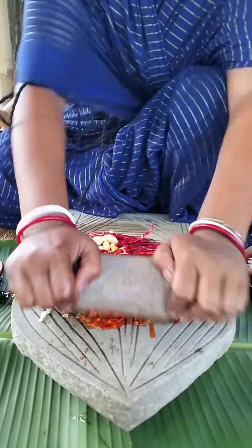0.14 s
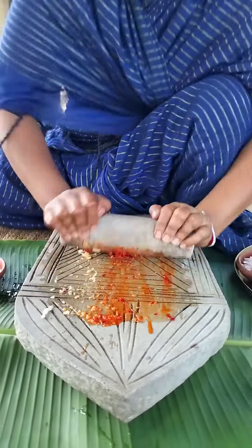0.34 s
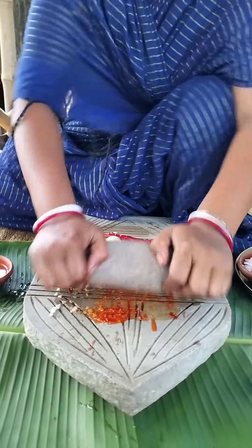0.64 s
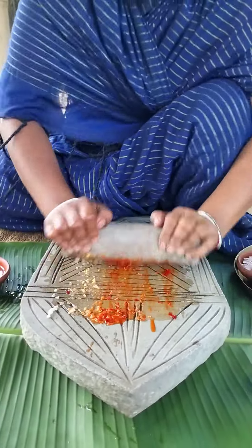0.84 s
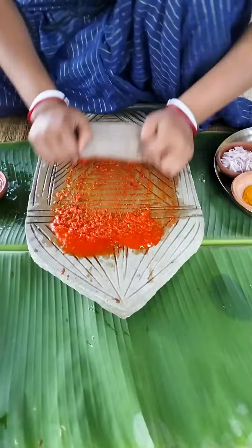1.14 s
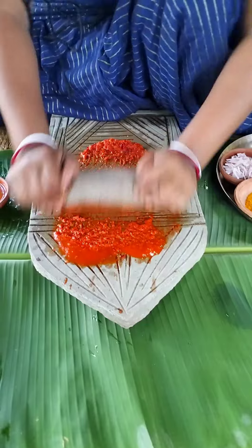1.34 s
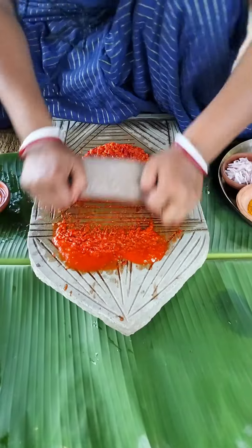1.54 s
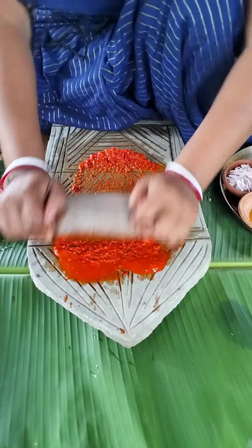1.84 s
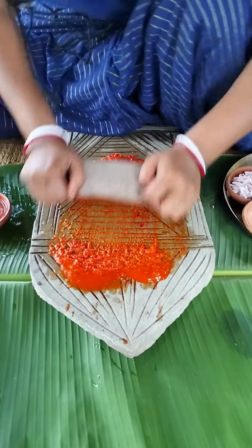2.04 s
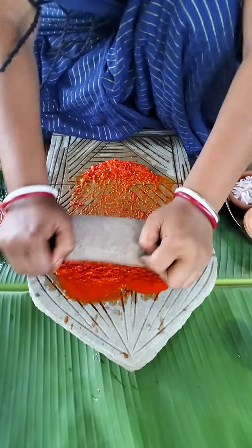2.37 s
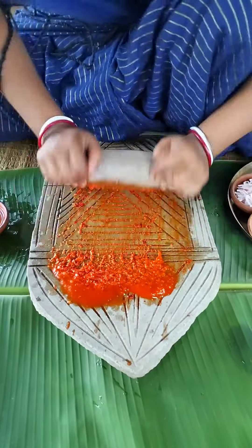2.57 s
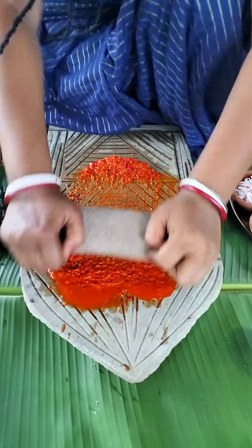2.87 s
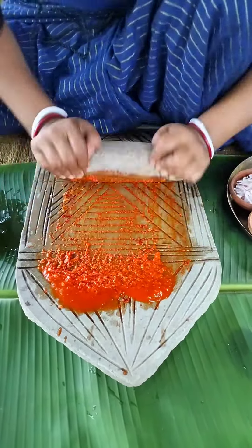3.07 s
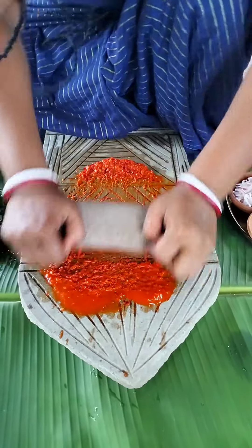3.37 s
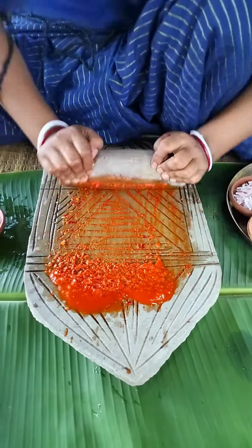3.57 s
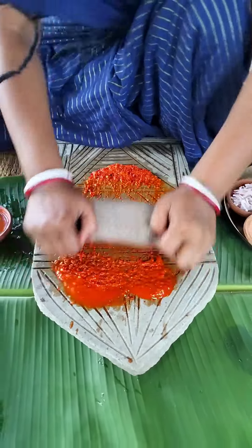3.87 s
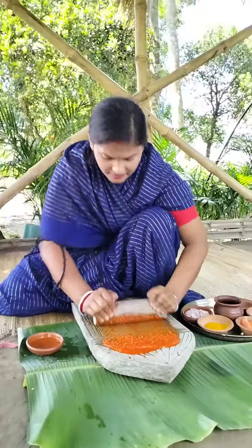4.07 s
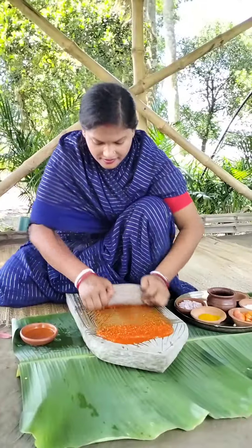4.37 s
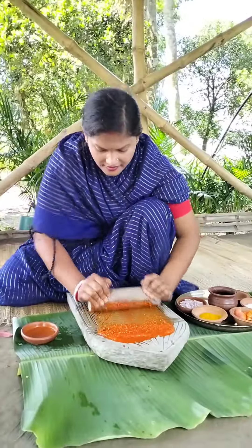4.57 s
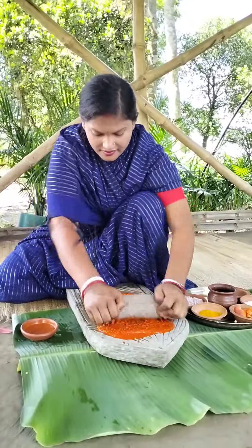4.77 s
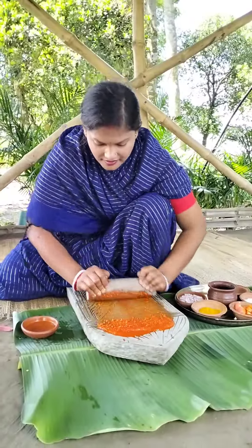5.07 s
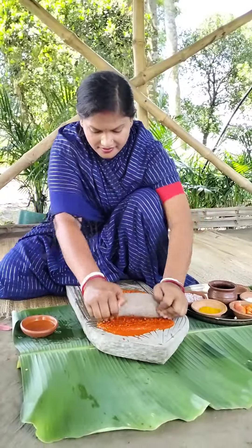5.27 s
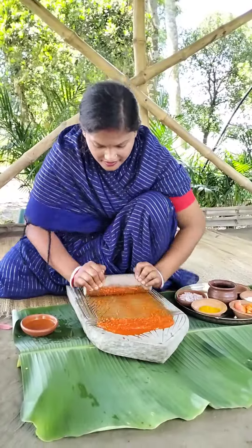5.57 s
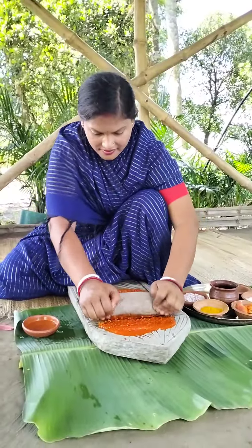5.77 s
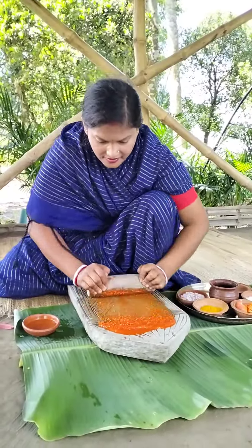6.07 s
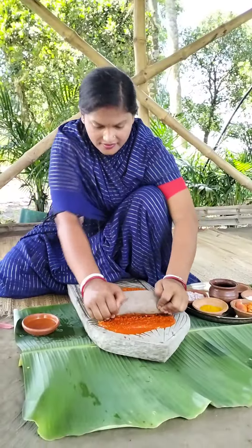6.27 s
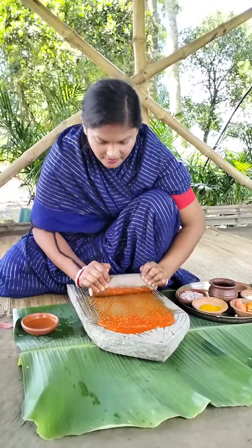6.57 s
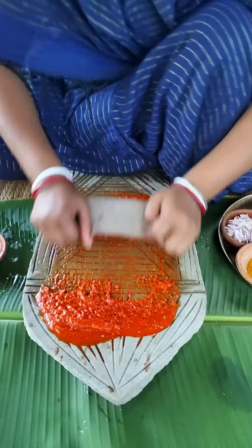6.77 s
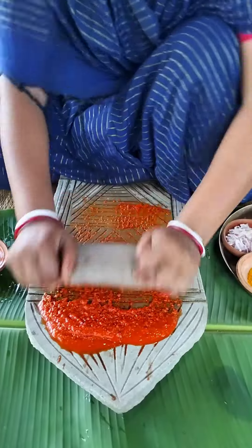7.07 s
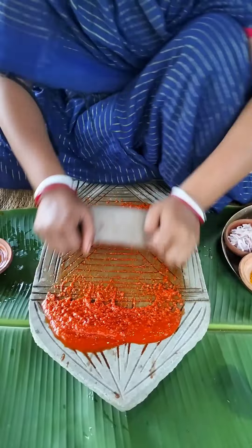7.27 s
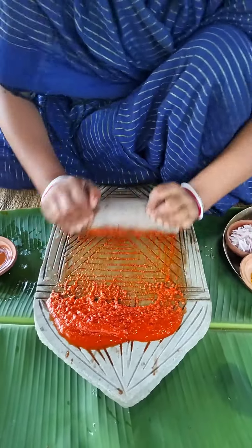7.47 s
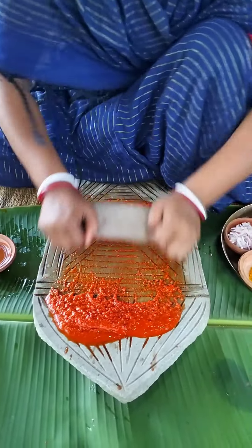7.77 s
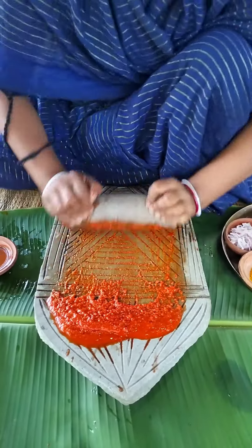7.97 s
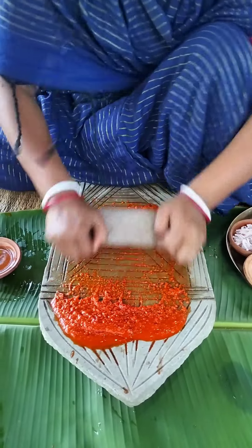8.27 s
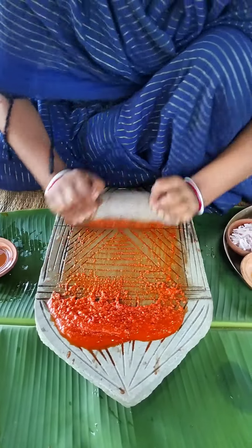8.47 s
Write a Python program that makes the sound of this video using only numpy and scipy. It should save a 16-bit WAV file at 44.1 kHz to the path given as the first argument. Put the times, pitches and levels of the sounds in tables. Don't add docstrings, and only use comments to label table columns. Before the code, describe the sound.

A stone roller is pushed back and forth over a grooved slab, knocking and ringing hollowly, with gritty wet hiss, bangle clicks and buffeting wind.

```python
import sys
import numpy as np
from scipy import signal
from scipy.fft import rfft, irfft, next_fast_len
from scipy.io import wavfile
from scipy.ndimage import uniform_filter1d, map_coordinates

SR = 44100
rng = np.random.default_rng(int(sys.argv[2]) if len(sys.argv) > 2 else 0)


def int16_out(signal):
    q = np.round(np.clip(np.atleast_2d(signal).T, -1, 1) * 32767)
    wavfile.write(sys.argv[1], SR, q.astype(np.int16))


def decibels_to_gain(level_db):
    exponent = np.asarray(level_db, float) / 20
    return 10 ** exponent


N = 380583

# (start [s], left lag [samples], left minus right [dB], low slab note [dB], upper ring notes [dB])
SHOTS = [
    (0, 8, 2.5, 11.5, -5),
    (1.12, -4.5, 0.9, 4, -3),
    (4.02, 9, -1.1, 11.5, 4.5),
    (6.69, -5.5, 0.7, 3, -1.2),
]
START, LAG, PAN, LOW, UPPER = range(5)
# (start [s], end [s])
SILENCE = (6.677, 6.694)
# (grit hiss [dB], wet fizz [dB])
PASTE = [
    (-41, -48.5),
    (-45.5, -53.5),
    (-51.5, -58),
    (-47, -57),
]
WIND_THUD = [(6.2,), (-0.35,), (.5,), (0.323,)]
SECOND_HEARD = [(3.6,), (-0.67,), (0.57,), (-4,)]

# (time [s], level [dB], left minus right [dB])
WIND = [(0, -39, 7.5), (.3, -41, 11.5), (.41, -26, 15.5), (.78, -26.5, 0), (1.05, -33, 8), (1.2, -41, -2),
        (1.35, -30, 1), (1.78, -35.5, -1), (2.1, -38, -1), (2.76, -37, -6), (3.1, -34.5, 5.5),
        (3.62, -34.5, -5), (4.0, -27.5, -8), (4.03, -46.5, 0), (4.6, -52.5, -4.5), (7.1, -42.5, 2.5),
        (7.85, -39.5, -3), (8.63, -39.5, 8.5)]
# (time [s], peak [dB], left minus right [dB], length [s])
GUSTS = [(0.11, -38, 5.5, 0.068), (0.186, -38, 27, 0.12), (0.438, -24, 25, 0.097), (0.566, -32, 12, 0.064),
         (0.73, -11.5, -18, 0.053), (0.85, -21.5, -10, 0.08), (0.898, -22, -9, 0.098),
         (1.011, -24.5, 11, 0.052), (1.086, -24.5, 13.5, 0.027), (1.356, -32, 3, 0.057),
         (1.55, -26.5, -4, 0.068), (1.675, -28, -5, 0.053), (1.92, -19, 29.5, 0.155),
         (2.079, -19.5, 25, 0.03), (2.208, -24, -5, 0.14), (2.356, -31.5, 0, 0.087),
         (2.49, -24.5, -21, 0.078), (2.573, -23.5, -22, 0.065), (2.747, -21.5, -20, 0.034),
         (2.903, -27.5, -12, 0.057), (3.278, -21.5, -21, 0.039), (3.418, -17.5, -12, 0.108),
         (3.565, -19, -26, 0.041), (3.686, -13, -27, 0.091), (3.847, -16, -15, 0.088),
         (3.935, -43, -6.5, 0.087), (5.116, -54, 0.5, 0.087), (7.146, -42, 3, 0.067),
         (7.86, -36, -13, 0.24), (8.513, -41, 5, 0.116)]
# (frequency [Hz], level [dB per Hz])
WIND_COLOUR = [(12, -32.5), (20, -25.5), (43, 3.5), (113, 3), (157, -6.5), (223, -14), (325, -26),
               (450, -33), (580, -32.5), (990, -120)]

# (start [s], end [s], early ring [dB], late ring [dB], scrape [dB])
PUSHES = [(0, 0.052, -29, -43, -28), (0.324, 0.525, -24.5, -42.5, -34), (0.778, 0.943, -30, -25, -31.5),
          (1.194, 1.329, -22, -20.5, -39), (1.636, 1.856, -23.5, -36, -45),
          (2.103, 2.265, -28.5, -22, -34.5), (2.571, 2.728, -26.5, -22.5, -36),
          (3.057, 3.198, -22.5, -20, -29.5), (3.509, 3.703, -23.5, -22, -38), (3.962, 4.068, -49, -31, -37),
          (4.399, 4.616, -26.5, -32, -45), (4.919, 5.143, -24, -36.5, -39.5),
          (5.446, 5.646, -23, -26.5, -28.5), (5.977, 6.165, -32.5, -24, -48),
          (6.477, 6.747, -34.5, -25.5, -58), (6.684, 6.731, -28, -28, -30.5),
          (6.827, 7.01, -27, -24.5, -39.5), (7.313, 7.537, -32.5, -21.5, -37),
          (7.833, 8.039, -19.5, -21, -34.5), (8.327, 8.55, -25, -21.5, -34.5)]
# (start [s], end [s], ring [dB], scrape [dB], wetness [dB])
PULLS = [(0.067, 0.239, -32.5, -37, 2), (0.505, 0.66, -29, -35.5, 8.5), (0.992, 1.117, -25.5, -30, 3),
         (1.388, 1.577, -31.5, -34, -3.5), (1.86, 2.053, -29, -31.5, -7), (2.318, 2.502, -29, -31.5, -1),
         (2.765, 2.991, -32, -36, -4), (3.261, 3.457, -25.5, -30, -0.5), (3.748, 3.945, -28.5, -32.5, 1),
         (4.11, 4.317, -33, -37.5, 5), (4.638, 4.841, -33.5, -36.5, 10), (5.169, 5.395, -32, -36.5, 3),
         (5.708, 5.895, -31, -36.5, 11), (6.179, 6.43, -34, -37, 2), (7.074, 7.28, -30, -37.5, -4),
         (7.573, 7.798, -32, -35, 0.5), (8.085, 8.294, -28.5, -34, 1.5), (8.602, 8.675, -23.5, -37, -7)]
# (time [s], peak [dB])
THUDS = [(.399, -11.5), (.459, -17.5), (.859, -7), (1.745, -12), (2.176, -12.5), (2.212, -6.5),
         (2.623, -13.5), (2.652, -8), (2.676, -12), (3.147, 0), (3.134, -0.5), (3.592, -6), (3.685, -16),
         (3.978, -20), (4.034, -14.5), (4.464, -15.5), (5.516, -6), (6.049, -15), (6.083, -11),
         (6.544, -22.5), (6.916, -14.5), (6.944, -12), (7.404, -8), (7.419, -3.5), (7.936, -5), (7.956, -5),
         (8.428, -4), (3.62, -5.5), (5.527, -9), (8.502, -7)]
# (time [s], peak [dB], clatter above the ring [dB])
PUSH_CLACKS = [(.016, -27.5, 3.5), (.842, -11.5, -23), (.916, -22, -7), (1.224, -22, -7),
               (1.238, -11, -8.5), (1.67, -15.5, -6), (1.695, -21.5, -1.5), (3.087, -9.5, -27),
               (3.56, -11.5, -12), (4.42, -20, -1.5), (5.103, -16.5, -3), (5.09, -10.5, -7.5),
               (5.454, -21, 1), (5.467, -17.5, 0), (5.481, -15.5, -1.5), (5.574, -16.5, -2.5),
               (5.617, -8.5, 1.5), (6.644, -12.5, -11), (6.698, -21, -26), (7.348, -16.5, -11.5),
               (7.442, -8, -9.5), (7.494, -6.5, -13), (7.857, -28, -4), (7.914, -2, -8.5),
               (7.989, -3.5, -13), (8.358, -7.5, -8.5), (8.4, -5.5, -13.5), (8.414, -0.5, -7.5),
               (8.513, -2, -11.5), (8.524, -5.5, -6.5)]
# (time [s], peak [dB], clatter above
# the knock [dB])
PULL_CLACKS = [(.129, -6.5, -2.5), (.198, -17, 4), (.56, -25, -13), (.585, -8.5, -4.5), (1.031, -11, -7.5),
               (1.063, -11, -20), (1.893, -13, -11), (3.839, -17.5, -19), (8.262, -18, -18),
               (2.352, -17, -20), (3.308, -15, -20), (3.775, -14, -22), (4.695, -21, -16),
               (5.751, -17.5, -12), (7.619, -18, -24), (7.638, -13, -16), (8.121, -14.5, -20),
               (8.138, -7, -14), (8.164, -2.5, -16)]
# (time [s], peak [dB])
NUDGES = [(.177, -15), (4.194, -18), (7.218, -13.5), (.102, -35), (.355, -22), (.372, -18.5), (1.016, -27),
          (1.424, -24.5), (1.475, -25), (1.88, -26), (2.119, -24), (2.835, -23), (2.893, -18.5),
          (3.112, -13.5), (3.123, -9.5), (3.364, -11.5), (3.527, -25.5), (3.673, -31), (4.517, -22),
          (4.769, -19.5), (4.952, -23), (4.978, -19.5), (5.01, -13.5), (5.035, -14), (5.077, -17),
          (5.6, -10), (5.702, -28.5), (6.031, -29), (6.862, -18), (6.885, -16.5), (7.184, -22), (7.32, -30),
          (7.384, -27), (7.464, -23), (7.588, -41), (7.9, -12.5), (7.506, -6.5), (7.522, -17.5),
          (7.872, -24), (8.012, -12.5), (7.945, -5.5), (7.965, -14), (1.25, -15.5), (6.93, -17),
          (6.965, -26), (5.495, -15), (8.228, -19), (8.346, -30), (8.44, -10.5), (8.489, -25), (.39, -14),
          (.425, -22), (1.51, -22), (3.607, -8.5), (3.38, -10), (3.855, -14), (7.76, -22.5), (7.008, -29),
          (2.688, -13)]
# (time [s], peak [dB])
SKIPS = [(.017, -14.5), (.121, -21), (.459, -14.5), (.568, -16), (.595, -9), (1.046, -13), (1.084, -22),
         (1.436, -18.5), (1.454, -16), (1.475, -16.5), (1.913, -18), (1.929, -17), (2.372, -15),
         (2.844, -17.5), (2.859, -18), (3.29, -20), (3.335, -19), (3.345, -17), (3.799, -24), (4.2, -20),
         (5.255, -23), (5.353, -20), (5.744, -23), (5.762, -18), (5.786, -24), (5.811, -23), (7.094, -25),
         (7.118, -22), (7.152, -22), (7.159, -21), (7.649, -11), (7.667, -20), (7.678, -16), (8.104, -27),
         (8.129, -18), (8.15, -17), (8.157, -16), (8.175, -13), (8.187, -21), (5.454, -17), (5.466, -15),
         (5.481, -11), (5.492, -11), (5.503, -18), (5.61, -12), (5.624, -12), (.103, -23), (.356, -19),
         (7.602, -22)]
# (frequency [Hz], width [Hz], level [dB])
RING = [(823, 46.7, 7), (882, 88.6, -1), (957, 30, -14)]
# (frequency [Hz], width [Hz], level [dB])
CLATTER = [(491, 41, -11), (825, 116, 0.5), (1403, 400, -13.5), (1143, 350, -4), (1820, 450, -8.5),
           (2074, 101, 0), (2715, 30, -10.5), (3400, 120, -10.5), (4360, 180, -5)]
# (frequency [Hz], width [Hz], level [dB])
SLAB = [(427, 82, -22), (1992, 48, -31.5)]
# (frequency [Hz], width [Hz], level [dB])
SECOND = [(1072, 56, 6)]
# (frequency [Hz], width [Hz], level [dB])
DRAG_SLOW = [(750, 64, -1.3)]
# (frequency [Hz], width [Hz], level [dB])
DRAG_FAST = [(975, 162, 1.5), (1090, 290, -6)]
# (frequency [Hz], width [Hz], level [dB])
HOLLOW = [(512, 183, -13)]
# (frequency [Hz], width [Hz], level [dB])
LOOSE = [(787, 76, 3), (1163, 93, -3.5), (2090, 130, -7.5)]

# (frequency [Hz], level [dB per Hz])
GRIT_COLOUR = [(1180, -20.5), (2000, -2), (2390, -6.5), (3970, -8.5), (4920, -7), (5940, -14), (9000, -25),
               (11700, -31.5), (19800, -120)]
# (frequency [Hz], level [dB per Hz])
FIZZ_COLOUR = [(3530, -40), (6000, -3.5), (7280, -1.5), (8160, -6), (11800, 1), (14600, -2), (16000, -14)]
# (time [s], peak [dB])
CRACKS = [(0.0162, -15.5), (.0628, -24), (.1027, -20.5), (.112, -17), (0.129, -18.5), (.196, -24.5),
          (.3386, -32), (0.3594, -23), (0.411, -30), (0.4719, -23), (.565, -16), (.816, -52), (0.9177, -19),
          (0.9978, -21), (1.024, -18.5), (1.09, -30), (1.102, -44.5)]

# (time [s], peak [dB])
TURN_CLICKS = [(0.2685, -8), (0.326, -21), (0.471, -20), (0.6622, -28.5), (0.6834, -18.5), (0.7358, -22),
               (1.828, -24.5), (2.057, -29), (2.2881, -23), (2.336, -27), (2.5241, -23.5), (2.7734, -26),
               (2.9946, -20), (3.231, -21.5), (3.717, -25.5), (4.082, -23), (4.1121, -25), (4.362, -25),
               (4.6216, -23), (4.656, -22), (5.1456, -25), (5.1696, -25), (5.6897, -28), (6.4175, -26),
               (7.287, -29), (7.581, -29), (7.801, -21.5), (8.07, -16.5), (8.353, -23), (8.615, -23)]
# (time [s], peak [dB], time to fall 60 dB [s])
JOLTS = [(0.021, -13, 0.044), (0.0439, -16.5, 0.0316), (.51, -26, 0.048), (1.268, -30, 0.043),
         (1.292, -24.5, 0.034), (1.363, -27, 0.07), (1.885, -25, 0.028), (0.862, -28, 0.029),
         (0.916, -15.5, 0.078), (1.001, -27.5, 0.14), (5.1, -19.5, 0.027), (5.618, -19, 0.023),
         (5.7478, -26, 0.038), (6.5416, -27, 0.029), (6.663, -22, 0.038), (6.704, -33.5, 0.11),
         (7.043, -29, 0.039), (7.151, -28, 0.052), (7.25, -30, 0.047), (6.7527, -24.5, 0.081),
         (6.8187, -14.5, 0.056), (7.5052, -22, 0.033), (7.8994, -28, 0.04), (8.3605, -29.5, 0.138)]
# (frequency [Hz], level [dB])
BANGLE_NOTES = [(5300, -8.5), (6600, -0.5), (8100, -5.5), (10130, -2.5), (11900, 1.5), (12250, -9),
                (12700, -12), (13050, 4.5), (14300, -4), (15330, -5)]

# (time [s], level [dB])
WHISTLES = [
    (1.562, -49),
    (2.02, -56),
]
# (frequency [Hz], level [dB per Hz])
AIR_COLOUR = [(59, -48), (100, 7.5), (836, 3), (2860, -13), (3940, -18), (5300, -30), (5770, -40),
              (6290, -64.5), (16000, -24)]
# (frequency [Hz], width [Hz])
THIN_BANDS = [(6400, 610), (8600, 1200)]

SIDE = np.array([[.5], [-.5]])
PULL_SWELL = 0.43


def unit(x):
    return x / np.sqrt(np.mean(x ** 2) + 1e-20)


def curves(rows):
    s, *cols = np.transpose(rows)
    return [np.interp(np.arange(N) / SR, s, c) for c in cols]


def by_shot(column, table=SHOTS):
    starts = np.array(SHOTS)[:, START]
    shot = np.searchsorted(starts, np.arange(N) / SR, "right") - 1
    return np.array(table)[shot, column]


def wobble(rate):
    steps = np.arange(0, N + 64, 64)
    knots = rng.standard_normal(int(N * rate / SR) + 4)
    return np.interp(np.arange(N), steps, map_coordinates(knots, [steps * rate / SR]))


def filtered(x, response):
    m = next_fast_len(N + 8192)
    return irfft(rfft(x, m) * response(np.fft.rfftfreq(m, 1 / SR)), m)[..., :N]


def colour(points):
    f, db = np.transpose(points)
    return lambda hz: decibels_to_gain(np.interp(np.log(hz + 1), np.log(f + 1), db))


def grains(rate, spread_db):
    hit = rng.random(N) < rate / SR
    size_db = spread_db * np.minimum(rng.exponential(size=N), 3)
    return unit(hit * rng.choice([-1, 1], N) * decibels_to_gain(size_db))


def rush(spectrum, alike, patchy_db):
    z = signal.stft(rng.standard_normal((2, N)), nperseg=256)[2]
    field = uniform_filter1d(rng.standard_normal(z.shape[1:]), size=3, axis=0)
    field = uniform_filter1d(field, size=20, axis=1)
    a, b = signal.istft(z * decibels_to_gain(patchy_db * unit(field)), nperseg=256)[1][:, :N]
    turn = np.arccos(np.clip(alike, -1, 1)) / 2
    stereo = np.cos(turn) * a + np.sin(turn) * np.array([b, -b])
    return unit(filtered(stereo, colour(spectrum)))


def resonate(force, hz, width):
    return signal.lfilter(*signal.iirpeak(hz, hz / width, SR), force)


def struck(force, notes, sway_db):
    out = 0
    for k, (hz, width, db) in enumerate(notes):
        out = out + (-1) ** k * decibels_to_gain(db) * resonate(force * decibels_to_gain(sway_db * wobble(14)), hz, width)
    return out


def pressure(strokes, early_db, late_db, swell=0.34):
    out = np.zeros(N)
    for start, end, early, late in np.broadcast(strokes[0], strokes[1], early_db, late_db):
        part = out[round(start * SR):round(end * SR)]
        u = np.arange(len(part)) / SR / (end - start)
        shape = np.clip(np.minimum(u / swell, (1 - u) / (swell + 0.014)), 0, 1) ** 0.81
        part[:] = shape * decibels_to_gain(np.interp(u, [.25, .75], [early, late]))
    keep = np.exp(-1 / (0.059 * SR))
    return out + 0.096 * signal.filtfilt([1 - keep], [1, -keep], out)


def eddies():
    level_db, pan_db = curves(WIND)
    out = decibels_to_gain(level_db + SIDE * pan_db)
    for s, db, pan, length in GUSTS:
        bump = np.hanning(round(2 * length * SR))
        gain = decibels_to_gain(db + SIDE * pan - abs(pan) / 2 + 2.0)
        out[:, round((s - length) * SR):][:, :len(bump)] += gain * bump
    return out


def wind():
    slow = np.array([wobble(8.0), wobble(9.8)])
    quick = np.array([wobble(25), wobble(25)])
    lumps = decibels_to_gain(0.54 * slow + 2.74 * quick)
    low = unit(lumps * rush(WIND_COLOUR, alike=0.28, patchy_db=1.5))
    thuds = filtered(low * np.abs(low), lambda hz: 1 / (1 + (180 / (hz + 1)) ** 4) / (1 + (hz / 560) ** 4))
    return decibels_to_gain(0.96) * eddies() * (low + 0.32 * decibels_to_gain(by_shot(0, WIND_THUD)) * thuds)


def groove_knocks():
    blows, clacks, skips = np.zeros((3, N))
    thud_clatter_db, nudge_clatter_db = -24.5, -19
    firm = [(s, db, thud_clatter_db) for s, db in THUDS] + list(PUSH_CLACKS)
    firm += [(s, db, nudge_clatter_db) for s, db in NUDGES]
    for knocks, target in [(firm, blows), (PULL_CLACKS, skips)]:
        for s, db, clatter_db in knocks:
            sign = rng.choice([-1, 1])
            target[round(s * SR)] = sign * decibels_to_gain(db + 39.0)
            clacks[round(s * SR)] = sign * decibels_to_gain(db + clatter_db + 36.0)
    for s, db in SKIPS:
        skips[round(s * SR)] = decibels_to_gain(db + 36.5)
    clacks = signal.sosfilt(signal.butter(3, 2420, fs=SR, output="sos"), clacks)
    skips = signal.sosfilt(signal.butter(2, [560, 1700], "band", fs=SR, output="sos"), skips)
    return blows, clacks, skips


def drag_hum(back, rough):
    speed = pressure(back, 5.5, -5.5, swell=0.28)
    weight = pressure(back, back[3], back[3] - 2, swell=PULL_SWELL)
    rub = decibels_to_gain(16.5) * weight * (rough + 0.7 * rng.standard_normal(N))
    return struck(rub, DRAG_SLOW, sway_db=2.0) + struck(speed ** 1.1 * rub, DRAG_FAST, sway_db=1.0)


def roller():
    bumps = 0.63 * grains(300, spread_db=2.0) + 0.74 * rng.standard_normal(N)
    judder = decibels_to_gain(4.9 * np.clip(wobble(35), -3, 1.1))
    rough = judder * grains(450, spread_db=2.5) + 0.32 * rng.standard_normal(N)
    blows, clacks, skips = groove_knocks()

    fore, back = np.transpose(PUSHES), np.transpose(PULLS)
    drag = pressure(fore, fore[4], fore[4] - 10)
    drag += pressure(back, back[3], back[3] - 4, swell=PULL_SWELL)
    lean = pressure(fore, fore[2], fore[3])
    lean += pressure(back, back[2], back[2] + 1, swell=PULL_SWELL)
    scrape = decibels_to_gain(14.5) * drag * rough
    force = decibels_to_gain(17.5) * lean * bumps + blows

    ring = struck(force, RING[:1], sway_db=1.5)
    ring -= struck(decibels_to_gain(by_shot(UPPER)) * force, RING[1:], sway_db=3.5)
    ring = decibels_to_gain(2.0) * resonate(ring, 850, 450)
    slab = struck(decibels_to_gain(by_shot(LOW)) * (force + 0.48 * scrape), SLAB[:1], sway_db=1.5)
    slab += struck(force, SLAB[1:], sway_db=8.5)

    clatter = struck(scrape + clacks, CLATTER, sway_db=3.0)
    second_force = decibels_to_gain(by_shot(0, SECOND_HEARD)) * (0.51 * scrape + clacks)
    clatter += struck(second_force, SECOND, sway_db=2.5)
    hollow_weight = pressure(back, back[3] - 25, back[3] + 10, swell=0.12)
    clatter += struck(decibels_to_gain(14.5) * hollow_weight * rough, HOLLOW, sway_db=3.0)
    clatter += drag_hum(back, rough)
    for hz, width, db in LOOSE:
        clatter += decibels_to_gain(db - 2.5) * resonate(skips, hz, width)
    soft = signal.butter(3, 2900, fs=SR, output="sos")
    return signal.sosfilt(soft, ring + slab + clatter)


def delayed(x, samples):
    n = np.arange(N)
    return np.array([np.interp(n - d, n, x) for d in SIDE * samples])


def placed(x):
    lag = by_shot(LAG)
    upper_lag_share, upper_pan_db = 0.41, -2
    high = filtered(x, lambda hz: 1 / (1 + (1400 / (hz + 1)) ** 6))
    direct = delayed(x - high, lag)
    direct += decibels_to_gain(SIDE * upper_pan_db) * delayed(high, upper_lag_share * lag)
    direct *= decibels_to_gain(SIDE * by_shot(PAN))
    t = np.arange(SR // 10) / SR
    tail = rng.standard_normal((2, len(t))) * decibels_to_gain(-60 * t / 0.06) * (t > .002)
    tail = signal.sosfilt(signal.butter(4, [950, 2600], "band", fs=SR, output="sos"), tail)
    echoes = signal.fftconvolve(x[None], tail / np.linalg.norm(tail[0]), axes=1)[:, :N]
    return direct + decibels_to_gain(-20.0) * echoes


def grit():
    fore, back = np.transpose(PUSHES), np.transpose(PULLS)
    pushing, wet_db = pressure(fore, 0, 0), back[4]
    grit_wet_db = 0.5 * wet_db
    gritty = decibels_to_gain(-8) + decibels_to_gain(-7) * pushing + pressure(back, grit_wet_db + 0.81, grit_wet_db - 1.0)
    fizzy = decibels_to_gain(-5.5) + decibels_to_gain(-7.5) * pushing + pressure(back, wet_db - 0.3, wet_db - 0.5)
    each_side = np.array([grains(900, spread_db=5.0), grains(1200, spread_db=3.5)])
    crackle = .5 * grains(900, spread_db=14.5) + each_side
    sand = 0.8 * rush(GRIT_COLOUR, alike=0.021, patchy_db=3.0)
    sand += 0.32 * unit(filtered(crackle, colour(GRIT_COLOUR)))
    paste = 0.87 * rush(FIZZ_COLOUR, alike=0.061, patchy_db=4.0)
    paste += 0.68 * unit(filtered(crackle, colour(FIZZ_COLOUR)))
    sand *= decibels_to_gain(by_shot(0, PASTE) + 3.0) * gritty
    paste *= decibels_to_gain(by_shot(1, PASTE) + 3.5) * fizzy
    return decibels_to_gain([[-1.1], [1.1]] + 2.43 * wobble(40)) * (sand + paste)


def seeds():
    out, t = np.zeros((2, N)), np.arange(SR // 20) / SR
    for s, db in CRACKS:
        burst = rng.standard_normal((2, len(t))) + 0.654 * rng.standard_normal(len(t))
        fade = decibels_to_gain(db - 3 - 60 * t / 0.043)
        out[:, round(s * SR):][:, :len(t)] += fade * burst
    return signal.sosfilt(signal.butter(1, [2200, 7500], "band", fs=SR, output="sos"), out)


def bangles():
    out, t = np.zeros((2, N + SR)), np.arange(SR // 12) / SR
    hz, level_db = np.transpose(BANGLE_NOTES)
    turn_t60 = 0.045
    for s, db, t60 in [(s, db, turn_t60) for s, db in TURN_CLICKS] + list(JOLTS):
        strength = decibels_to_gain(level_db + rng.normal(0, 7.9, (2, len(hz))))
        phase = 2 * np.pi * (hz * rng.normal(1, 0.025, len(hz)))[:, None] * t
        phase += 0.2 * np.cumsum(rng.standard_normal(phase.shape), axis=1)
        ring = strength @ np.sin(phase) * decibels_to_gain(-60 * t / max(t60, .005))
        from_bounce = np.abs(t - rng.uniform(0.0064, 0.028))
        bounce = decibels_to_gain(rng.normal(-7.5, 2.6) - 60 * from_bounce / 0.016)
        burst = decibels_to_gain(-60 * t / 0.032) + bounce
        noise = rng.standard_normal((2, len(t) + 2)) + 0.21 * rng.standard_normal(len(t) + 2)
        tick = np.diff(noise, n=1)[:, 1:] * burst
        rise = 1 - np.exp(-(t / 0.00085) ** 2)
        click = decibels_to_gain(db - 17.5) * rise * (12 * t60 * ring + 1.86 * tick)
        out[:, round(s * SR - 30):][:, :len(t)] += click
    thinned = filtered(out[:, :N], lambda hz: 1j * hz / 4000 / (1 + 1j * hz / 4000))
    return decibels_to_gain([[-1.5], [1.5]]) * thinned


def bird():
    length, start_hz, fall_hz = 0.086, 1620, 260
    out, t = np.zeros(N), np.arange(round(length * SR)) / SR
    pitch = start_hz - fall_hz * (t / length) ** 2
    note = np.hanning(len(t)) * np.sin(2 * np.pi * np.cumsum(pitch) / SR)
    for s, db in WHISTLES:
        out[round(s * SR):][:len(t)] += decibels_to_gain(db) * note
    return out


def scene():
    air = decibels_to_gain(-47.5 - 3.0) * rush(AIR_COLOUR, alike=0.36, patchy_db=2.5)
    return wind() + placed(roller()) + grit() + seeds() + bangles() + bird() + air


def dropped(x, share):
    hz, _, z = signal.stft(x, SR, nperseg=1024)
    chance = rng.standard_normal(z.shape[1:])
    field = unit(uniform_filter1d(uniform_filter1d(chance, size=13, axis=0), size=7, axis=1))
    size = np.abs(z).mean(0) + 1e-9
    level = uniform_filter1d(np.log(size), size=9, axis=0)
    level = uniform_filter1d(level, size=7, axis=1)
    weak = level - uniform_filter1d(level, size=81, axis=0)
    thin = sum(.7 * np.exp(-((hz - centre) / width) ** 2) for centre, width in THIN_BANDS)
    score = np.where(hz[:, None] > 3600, field + 2.0 * weak - thin[:, None], 99)

    bass_over_treble = size[hz < 1500].mean(0) / size[hz > 11000].mean(0)
    masked = uniform_filter1d(np.log(bass_over_treble), size=3)
    usual_top_hz, sinks_hz, step_hz = 15650, 330, 345
    steps_down = np.round(sinks_hz / step_hz * unit(masked - masked.mean()))
    top_hz = usual_top_hz - step_hz * steps_down
    empty = (score < np.quantile(score, share)) | (hz[:, None] > top_hz)
    return signal.istft(z * np.where(empty, decibels_to_gain(-42), 1), SR, nperseg=1024)[1][:, :N]


def roll_off(x):
    return signal.sosfilt(signal.butter(12, 16820, fs=SR, output="sos"), x)


def record(dry):
    t = np.arange(N) / SR
    is_open = np.clip(np.maximum((SILENCE[0] - t) / 0.004, (t - SILENCE[1]) / 0.0034), 0, 1)
    x = filtered(dry, lambda hz: 1 / (1 + (hz / 16300) ** 70)) * is_open
    x = dropped(x, share=.16)
    x = x / (1 + np.abs(x / .97) ** 8) ** (1 / 8)
    return roll_off(x)


dry = scene()
out = record(dry)
int16_out(out)
```